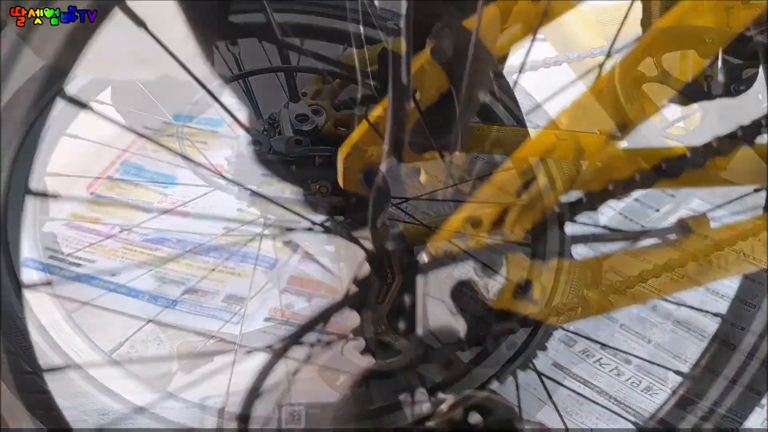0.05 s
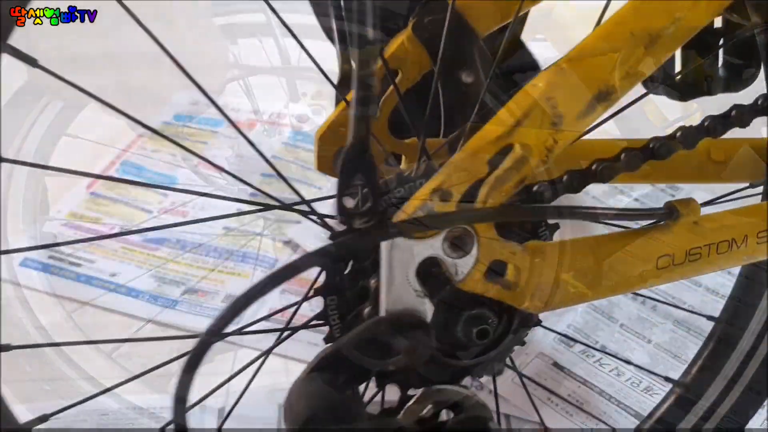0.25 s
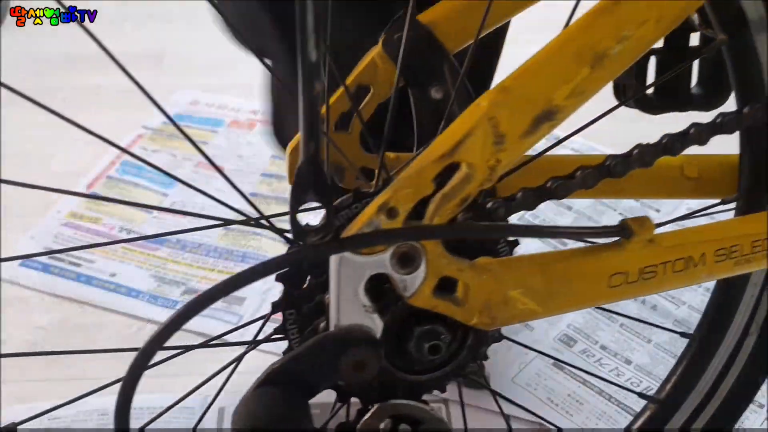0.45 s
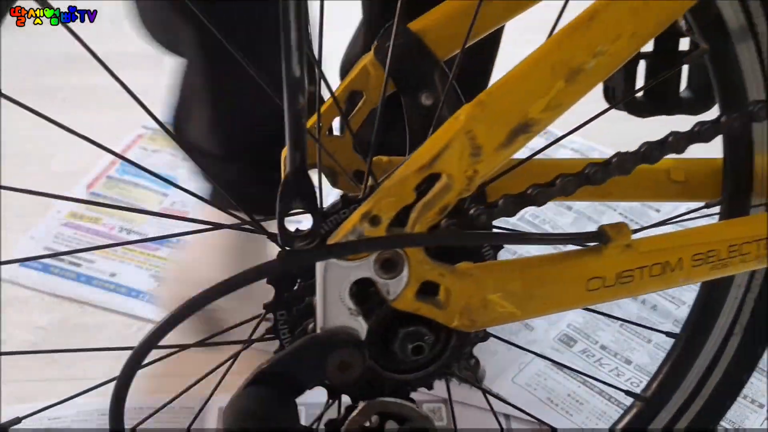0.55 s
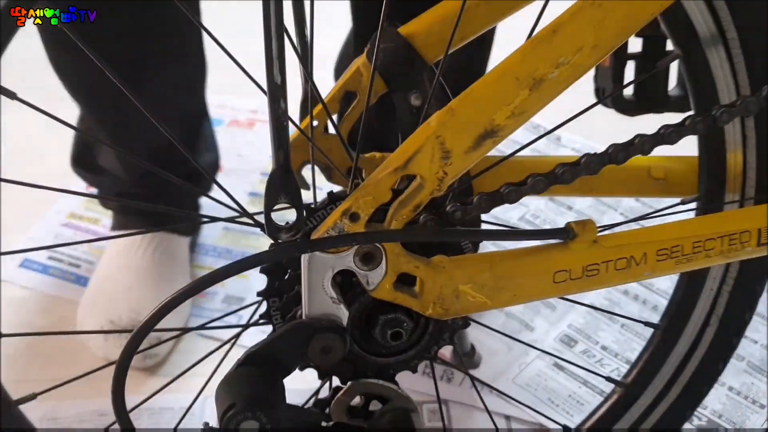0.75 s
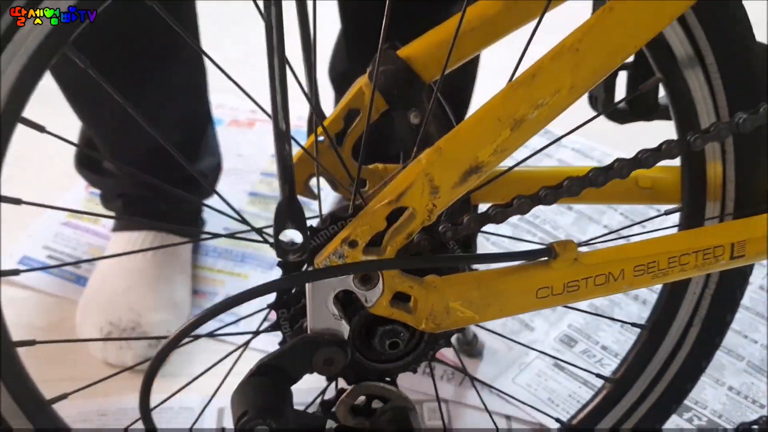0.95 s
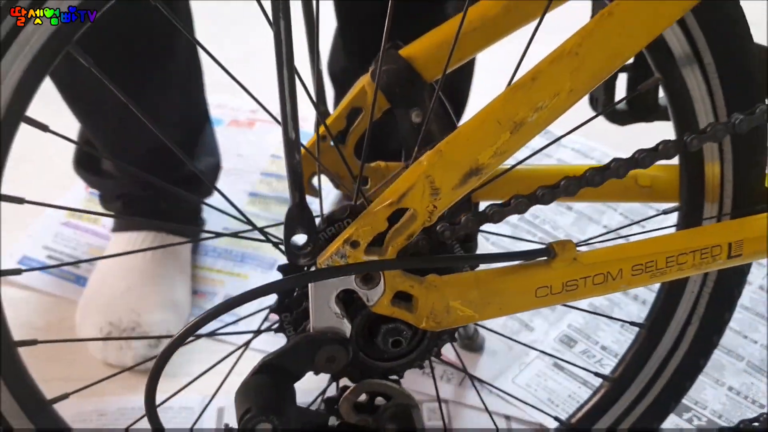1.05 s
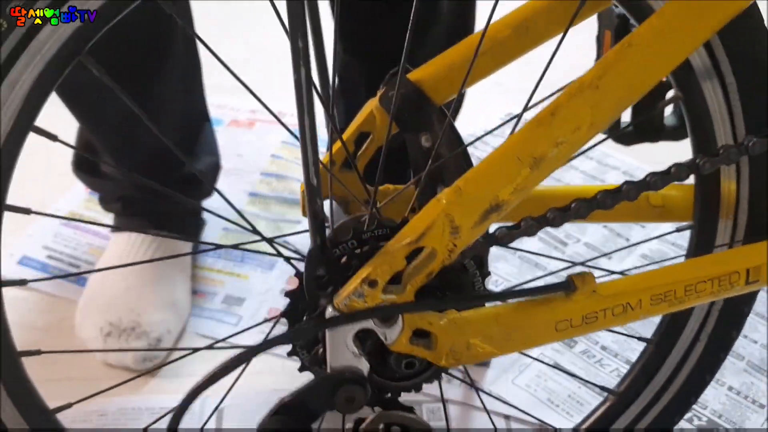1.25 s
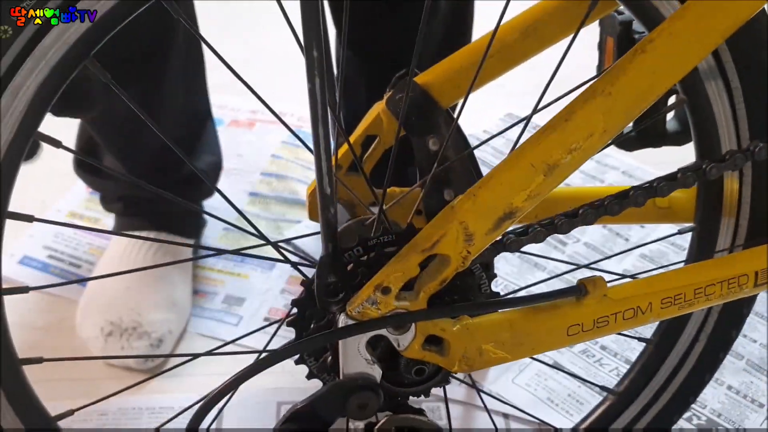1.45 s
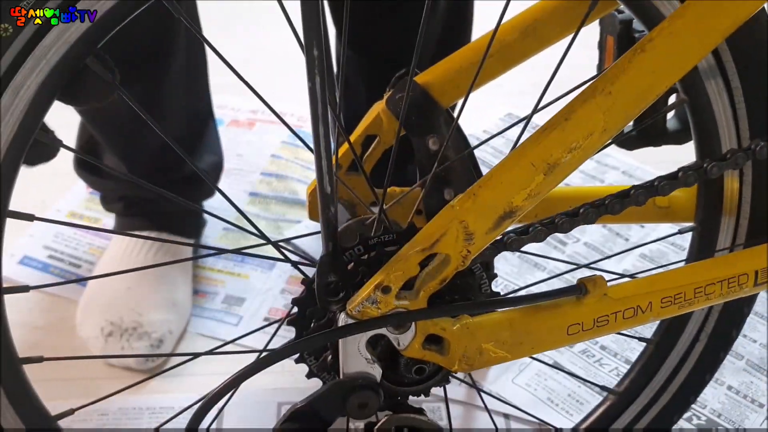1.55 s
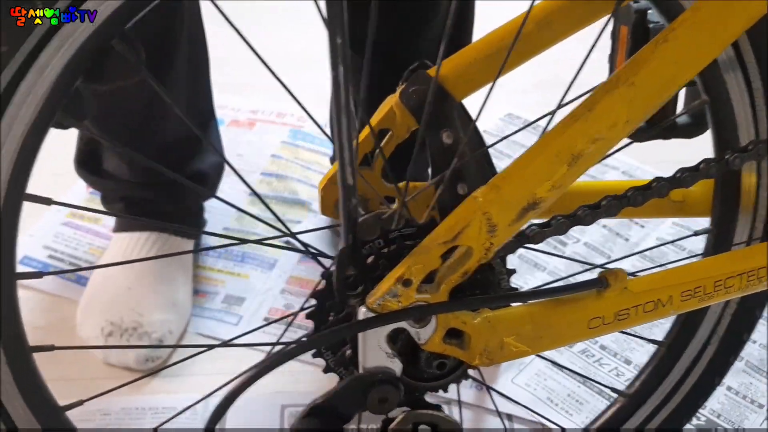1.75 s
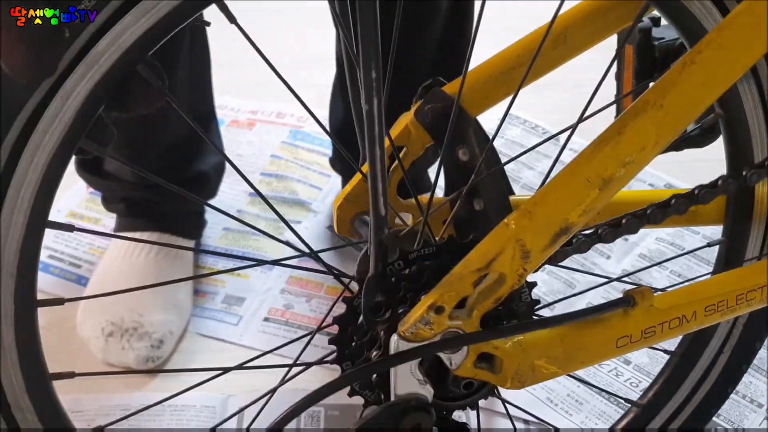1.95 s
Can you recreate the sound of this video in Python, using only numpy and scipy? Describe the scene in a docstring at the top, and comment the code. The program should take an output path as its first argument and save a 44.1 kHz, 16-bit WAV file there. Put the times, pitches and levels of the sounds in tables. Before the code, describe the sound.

Bicycle wheel scrapes and clacks sharply into its metal frame, then small ticks, knocks and rustling

```python
"""A bicycle wheel is eased back into its frame, close to a stereo microphone in a bare, hard room.
Metal scrapes as dense slips through resonances, then clacks home as cracks of noise and ringing modes.
Small parts tick in noise bursts, the frame knocks in decaying sines, and grains of noise make paper and
cloth rustle as a person shifts. Bumps reach the right microphone through its support; shaped noise gives
the low rumble and hiss under it all."""
import sys
import numpy as np
from scipy import signal
from scipy.fft import rfft, irfft
from scipy.io import wavfile

SR = 44100
rng = np.random.default_rng(int(sys.argv[2]) if len(sys.argv) > 2 else 0)


def dump_mix(stems):
    """Bounce the given channels to the path in sys.argv[1] as a 16-bit WAV at rate SR."""
    frames = np.atleast_2d(stems).T  # one column per channel
    limited = np.clip(frames, -1, 1)  # hard clip at full scale
    pcm = np.round(limited * 32767).astype(np.int16)
    wavfile.write(sys.argv[1], SR, pcm)


def magnitude_from_level(level_db):
    """Linear magnitude for a level in decibels (20 dB per decade)."""
    exponent = np.asarray(level_db, float) / 20
    return 10 ** exponent


N = 88200


def rms_one(x):
    """Scale to rms 1."""
    return x / np.sqrt(np.mean(x ** 2) + 1e-20)


def in_time(rows):
    """The dB columns of a curve in time as gains per sample."""
    s, *columns = np.transpose(rows)
    return [magnitude_from_level(np.interp(np.arange(N) / SR, s, db)) for db in columns]


def at_hz(points, hz):
    """Read a table on a log-frequency axis; its end values hold beyond it."""
    table_hz, value = np.transpose(points)
    return np.interp(np.log(np.maximum(hz, 1)), np.log(table_hz), value)


def bin_hz(n):
    """Frequencies of the spectrum of n samples."""
    return np.arange(n // 2 + 1) * SR / n


def colour(x, spectrum):
    """Shape by a spectrum without shifting phase."""
    n = x.shape[-1]
    return irfft(rfft(x) * magnitude_from_level(at_hz(spectrum, bin_hz(n))), n)


def causal(spectrum):
    """Minimum-phase impulse response of a spectrum."""
    # minimum_phase takes the root of the magnitude, so the dB are doubled first
    response = colour(np.eye(1, 4096)[0], np.array(spectrum) * [1, 2])
    return signal.minimum_phase(np.fft.fftshift(response)[1:])[None]


def diffuse(pair):
    """Two unrelated signals become left and right, alike in the bass, apart in the treble."""
    # likeness of the two microphones: f/Hz, correlation
    likeness = [(60, 0.92), (550, 0.48), (1650, 0.19), (4970, -0.015), (15000, -0.046)]
    # balance of the two microphones: f/Hz, left over right/dB
    left_over_right = [(60, -2), (380, 0.5), (2380, 2), (15000, 0.5)]
    n = pair.shape[-1]
    alike = np.clip(at_hz(likeness, bin_hz(n)), -.95, .95)
    lean = magnitude_from_level(at_hz(left_over_right, bin_hz(n)) / 2)
    mid, side = rfft(pair) * np.sqrt([(1 + alike) / 2, (1 - alike) / 2])
    return irfft(np.array([(mid + side) * lean, (mid - side) / lean]), n)


def steady(spectrum):
    """Diffuse stereo noise of a given colour, rms 1."""
    return rms_one(colour(diffuse(rng.standard_normal((2, N))), spectrum))


def grains(per_s, spread_db):
    """Random clicks of uneven size in two unrelated streams."""
    present = rng.random((2, N)) < per_s / SR
    size = magnitude_from_level(spread_db * np.minimum(rng.exponential(1, (2, N)), 5))
    return present * size * rng.choice([-1, 1], (2, N))


def ring(x, hz, t60):
    """A damped mode: a unit click sets a sine of height 1 ringing."""
    r, w = magnitude_from_level(-60 / (t60 * SR)), 2 * np.pi * hz / SR
    return signal.lfilter([0, np.sin(w)], [1, -2 * r * np.cos(w), r * r], x + 1e-18)


def resonance(x, hz, width_hz):
    """Band-pass with gain 1 on top."""
    r = np.exp(-np.pi * width_hz / SR)
    poles = [1, -2 * r * np.cos(2 * np.pi * hz / SR), r * r]
    return signal.lfilter([(1 - r * r) / 2, 0, (r * r - 1) / 2], poles, x)


def soften(x, time_s):
    """One-pole low-pass: contact that gives over time_s."""
    r = np.exp(-1 / (time_s * SR))
    return signal.lfilter([1 - r], [1, -r], x)


def strike(s, db):
    """Stereo click train; db is one row for both sides or one row per side."""
    clicks = np.zeros((2, N))
    clicks[:, (np.asarray(s) * SR).astype(int)] = magnitude_from_level(db)
    return clicks


def dying(t60):
    """Exponential decay, cut after 90 ms."""
    return magnitude_from_level(-60 * np.arange(4000) / SR / t60)


def hiss():
    """Steady broadband noise."""
    # t he hiss through the band: f/Hz, level/dB per Hz
    hiss_colour = [(260, -35.5), (450, -10.5), (3090, -5), (7810, -9), (11300, -5), (14400, -10),
                   (16000, -26.5)]
    return magnitude_from_level(-69.5) * steady(hiss_colour)


def rumble():
    """Floor under shifting feet: two bands of noise, deep and boards, that swell and sink."""
    # level of the floor: t/s, deep rumble/dB, boards/dB
    movement = [(0, -59.5, -72.5), (.12, -62.5, -73), (.3, -65.5, -76.5), (.46, -58, -68.5),
                (.6, -68, -69.5), (.94, -70, -81.5), (1.1, -64.5, -73.5), (1.4, -60.5, -64.5),
                (1.6, -65.5, -68), (1.72, -67, -81.5), (1.88, -62, -60.5), (2, -51.5, -53)]
    # deep rumble: f/Hz, level/dB per Hz
    deep_colour = [(15, -68), (25, -26), (75, -5), (94, -8), (130, -18.5), (170, -60), (290, -120)]
    # boards: f/Hz, level/dB per Hz
    boards_colour = [(100, -23), (150, -2.5), (300, -1), (480, -6), (800, -38.5)]
    deep, boards = in_time(movement)
    return deep * steady(deep_colour) + boards * steady(boards_colour)


def rustle():
    """Paper and cloth: dense grains whose level and brightness follow the movement."""
    # movement: t/s, level/dB, extra treble/dB
    movement = [(0, -65, 19.5), (.035, -58, 8), (.13, -51, 1), (.45, -80, 14), (.51, -73, 7.5),
                (.56, -61.5, -24), (.68, -75, 8), (.72, -68.5, 7.5), (.87, -67.5, 8), (.94, -69.5, 5),
                (.98, -54.5, -0.5), (1.05, -61, 5), (1.09, -58, -8), (1.17, -61.5, -6),
                (1.23, -66.5, -12.5), (1.29, -55, -2), (1.33, -51, -3), (1.4, -64.5, 3), (1.43, -59, -4),
                (1.49, -60, -0.5), (1.55, -51, -3.5), (1.62, -70.5, -1), (1.71, -74, -7), (1.79, -61.5, 6),
                (1.86, -63.5, 11), (1.91, -65.5, 7.5), (1.965, -48, 10.5), (2, -56.5, 7.5)]
    # paper and cloth: f/Hz, level/dB per Hz
    rustle_colour = [(300, -28), (550, -7.5), (1500, -7.5), (3900, -9), (7500, -17), (12600, -17.5),
                     (16000, -27.5)]
    split_hz = 2670
    level, treble = in_time(movement)
    noise = rms_one(colour(diffuse(grains(per_s=7600, spread_db=1.95)), rustle_colour))
    low = signal.sosfiltfilt(signal.butter(1, split_hz, fs=SR, output="sos"), noise)
    return level * (low + treble * (noise - low))


def bumps():
    """Soft pushes set the microphone support swinging, heard almost only on the right."""
    # pushes on the support: t/s, level/dB, sharpness/dB, push 1 or pull -1
    pushes = [(1.002, -34.5, 19, -1), (1.0207, -22.5, -2.5, 1), (1.337, -42.5, -22, 1), (1.91, -38, 11, 1),
              (1.9264, -36.5, 0, 1)]
    # modes of the support: f/Hz, level/dB, t60/s
    support = [(55.5, 3, 0.132), (125, -13, 0.38), (250, -8.5, 0.055), (367, -14, 0.056)]
    rise_s, left_db = 0.0014, -33
    s, db, sharp_db, way = np.transpose(pushes)
    ways = np.ones(N)
    ways[(s * SR).astype(int)] = way
    out = 0
    for hz, level_db, t60 in support:
        drive_db = db + level_db + sharp_db * (hz > 200)  # sharpness drives only the upper modes
        out = out + ring(ways * strike(s, drive_db), hz, t60)
    return soften(out, rise_s) * magnitude_from_level([[left_db], [0]])


def ticks():
    """Small hard parts: each tick is a brief burst of noise, strongest round its centre."""
    # ticks: t/s, level/dB, left over right/dB, centre f/Hz, t60/s
    events = [(0.515, -50, 10, 7260, 0.01), (0.7046, -44.5, 7, 1474, .025),
              (0.8568, -39.5, -2.5, 3300, 0.035), (0.997, -39.5, 2.5, 2940, .02),
              (1.0323, -51, 6, 7900, 0.025), (1.0673, -30, 0, 7700, .015), (1.0713, -27, 1, 1490, 0.018),
              (1.1382, -43.5, 9, 2440, 0.011), (1.2756, -44, 5, 5060, 0.014),
              (1.3, -38.5, 5.5, 2320, 0.036), (1.3067, -34, -5.5, 1900, 0.023),
              (1.4186, -46.5, 8.5, 2200, 0.061), (1.5286, -36, 5, 5500, .02), (1.7277, -39, 0, 1800, 0.013),
              (1.7373, -45.5, 0, 7850, 0.012), (1.7655, -51, -4, 8100, 0.0091),
              (1.7736, -33.5, 17, 2300, 0.0041), (1.8536, -40.5, 7.5, 3820, 0.024),
              (1.928, -41.5, -5, 3800, .011), (1.937, -43.5, 16, 4300, .012),
              (1.946, -34, 10.5, 3870, 0.01), (1.9534, -32, -4.5, 3760, 0.012),
              (1.9603, -35, 6.5, 5300, .03), (1.964, -37.5, -9, 7100, 0.034),
              (1.978, -44, 8.5, 3000, 0.0094)]
    rise_s, q, broad_db = 0.00046, 2.1, -10.5
    snap = 16.5  # shorter ticks are broader, by snap / t60 Hz
    out = np.zeros((2, N + 4000))
    rise = 1 - np.exp(-np.arange(4000) / SR / rise_s)
    for s, db, pan_db, hz, t60 in events:
        both, left, right = rng.standard_normal((3, 4000))
        burst = (both + 1.21 * np.array([left, right])) * dying(t60) * rise
        broad = np.diff(burst, prepend=0) / 2
        burst = resonance(burst, hz, hz / q + snap / t60) + magnitude_from_level(broad_db) * broad
        start = int(s * SR)
        out[:, start:start + 4000] += burst * magnitude_from_level(db + np.array([[pan_db], [-pan_db]]) / 2)
    return out[:, :N]


def knocks():
    """A soft blow drives the frame modes near its centre most; the hand's grip scales their ring time."""
    # blows: t/s, level/dB, centre f/Hz, ring time under the grip as a factor
    blows = [(1.0707, -26.5, 595, 0.19), (1.302, -44, 305, 1.3), (1.3078, -36, 1010, 0.4),
             (1.5168, -33, 596, 0.71), (1.536, -39.5, 685, 0.6), (1.618, -46.5, 177, 0.29),
             (1.877, -53, 250, 0.5), (1.938, -33.5, 360, 0.43), (1.949, -38, 690, 0.38),
             (1.98, -38.5, 700, 0.45)]
    # modes of the frame: f/Hz, level/dB, t60/s
    frame_modes = [(93.5, -23, 0.092), (156, 1, 0.2), (214.5, -4, 0.13), (367, 1, 0.025),
                   (532.5, -3.5, 0.057), (729, 0.5, 0.069), (813, -6, 0.11), (1106, 7, 0.02)]
    reach_octaves, contact_s = 0.87, 0.00039  # a mode this far from the centre is driven 6 dB less
    out, t = np.zeros(N + 8000), np.arange(8000) / SR
    hz, level_db, t60 = np.transpose(frame_modes)[..., None]
    signs = (-1) ** np.arange(1, len(hz) + 1)
    for s, db, centre, free in blows:
        uneven_db = 2 * rng.standard_normal(hz.shape)
        drive_db = db + level_db - 6 * (np.log2(hz / centre) / reach_octaves) ** 2 + uneven_db
        modes = magnitude_from_level(drive_db - 60 * t / (t60 * free)) * np.sin(2 * np.pi * hz * t)
        start = int(s * SR)
        out[start:start + 8000] += signs @ modes
    return soften(out[:N], contact_s)


def rub(pressure, resonances):
    """Metal on metal: dense slips excite a few broad resonances, pressure setting the level."""
    slips = diffuse(grains(per_s=1400, spread_db=-0.5))
    sound = 0
    for k, (hz, width_hz, db) in enumerate(resonances):
        sound = sound + (-1) ** k * magnitude_from_level(db) * resonance(slips, hz, width_hz)
    return in_time(pressure)[0] * rms_one(sound)


def soft_scrape():
    """A second, softer rub on lower resonances."""
    # pressure: t/s, level/dB
    pressure = [(.5, -89.5), (.535, -68), (.56, -57.5), (.58, -67.5), (.6, -63), (.64, -89.5)]
    # resonances: f/Hz, width/Hz, level/dB
    resonances = [(780, 150, 0), (1300, 250, -2), (2500, 150, -1), (3200, 180, -2)]
    return rub(pressure, resonances)


def scrape():
    """The rub of metal on metal that leads into the clack."""
    # pressure: t/s, level/dB
    pressure = [(0, -57.5), (.036, -66.5), (.052, -53), (.077, -38), (.1, -66.5), (.112, -65.5),
                (.119, -62.5), (.132, -74), (.14, -94.5)]
    # resonances: f/Hz, width/Hz, level/dB
    resonances = [(1350, 300, -10), (2000, 120, -3), (3300, 250, -10), (3900, 200, 0), (5320, 250, -13)]
    return rub(pressure, resonances)


def clack():
    """A run of contacts, each a crack of noise and a blow to the light modes; heavy modes answer the main one.
    Returns the close sound and what fills the room, mostly the main crack."""
    # contacts: t/s, level/dB
    contacts = [(.1410, -26), (.1431, -15), (0.1452, -28.5), (0.1473, -26.5), (0.1489, -19.5),
                (0.153, -26.5), (0.158, -32.5), (.1620, -39)]
    # modes of the struck metal: f/Hz, level/dB, t60/s
    metal = [(555.5, -5.5, 0.065), (890, -8.5, 0.052), (1382, -12.5, 0.04), (1900, -11.5, 0.076),
             (2782, -4, 0.058), (3010, -7, .05), (3233, 5, 0.035), (3370, -0.5, 0.048), (3656, -3, 0.06)]
    # the crack: f/Hz, relative level/dB
    crack_colour = [(60, -26.5), (380, -24), (600, -15.5), (1000, -11.5), (1660, -13.5), (3300, -5),
                    (4860, -11), (7800, -18.5), (10500, -16), (14600, -29)]
    heavy_hz, swell_hz = 1000, 65  # modes below heavy_hz build up through a resonance swell_hz wide
    light_db, spread_db = -9.5, 3
    crack_db, crack_t60_s = 1.85, .012
    crack_to_room_db, ring_to_room_db = 28, -5
    s, db = np.transpose(contacts)
    main = np.arange(len(s)) == 1
    rings = 0
    for hz, level_db, t60 in metal:
        if hz > heavy_hz:
            strength_db = db + light_db + spread_db * rng.standard_normal((2, len(s)))
            mode = ring(strike(s, strength_db + level_db), hz, t60)
        else:
            strength_db = np.where(main, db, -200)
            mode = resonance(ring(strike(s, strength_db + level_db), hz, t60), hz, swell_hz)
        rings = rings + mode
    shape = signal.fftconvolve(strike(s, db + crack_db), dying(crack_t60_s)[None])[:, :N]
    tone = causal(crack_colour)
    tone = tone / np.sqrt(np.sum(tone ** 2))
    cracks = signal.fftconvolve(shape * diffuse(rng.standard_normal((2, N))), tone)[:, :N]
    main_crack = signal.fftconvolve(strike(s[main], db[main] + crack_to_room_db), tone)[:, :N]
    return rings + cracks, main_crack + magnitude_from_level(ring_to_room_db) * rings


def room(x):
    """Diffuse echoes of the left side, dying band by band, with a strong early part."""
    # decay of the room: f/Hz, t60/s
    decay = [(60, 0.47), (250, 0.44), (700, 0.55), (2000, 0.53), (4000, 0.44), (8000, 0.44), (15000, 0.19)]
    # colour of the echoes: f/Hz, relative level/dB
    echo_colour = [(60, 6), (300, 6), (1000, -1), (8000, -5.5), (15000, 6.5)]
    room_db, gap_s = -6.5, 0.0038
    early_db, early_t60_s = 19, 0.026
    t, echo = np.arange(SR) / SR, 0
    edges = 40 * 2. ** np.arange(0, 8.8, .5)  # half-octave bands
    white = rng.standard_normal((2, 2, SR))
    for k, (low, high) in enumerate(zip(edges, edges[1:])):
        band_pass = signal.butter(2, [low, high], "band", fs=SR, output="sos")
        band = signal.sosfilt(band_pass, white[k % 2])  # neighbouring bands take unrelated noise
        echo = echo + band * magnitude_from_level(at_hz(echo_colour, low) - 60 * t / at_hz(decay, low))
    early = 1 + magnitude_from_level(early_db - 60 * t / early_t60_s)
    onset = np.clip(t / gap_s - 1, 0, 1)  # silent for gap_s, then fading in
    echo = diffuse(echo) * early * onset
    echo = echo / np.sqrt(np.sum(echo ** 2) / 2)
    return magnitude_from_level(room_db) * signal.fftconvolve(x[:1], echo)[:, :N]


def scene():
    """Close sources and their room echoes, over support bumps, rustle, rumble and hiss."""
    tick_to_room_db, knock_to_room_db = -1.5, -5.5
    background = hiss() + rumble() + rustle() + bumps()
    small, frame = ticks(), knocks()
    rubs = soft_scrape() + scrape()
    close, far = clack()
    wet = far + rubs + magnitude_from_level(tick_to_room_db) * small + magnitude_from_level(knock_to_room_db) * frame
    return background + small + frame + rubs + close + room(wet)


def band_limit(x):
    """A steep low-pass at the top of the band."""
    return signal.sosfilt(signal.butter(12, 16520, fs=SR, output="sos"), x)


def record(dry):
    """The microphone's response shapes the finished mix."""
    # microphone: f/Hz, response/dB
    microphone = [(20, -35.5), (45, -0.5), (15100, -1), (15800, -23)]
    mix = signal.fftconvolve(dry, causal(microphone))[:, :N]
    return band_limit(mix)


dry = scene()
out = record(dry)
dump_mix(out)
```